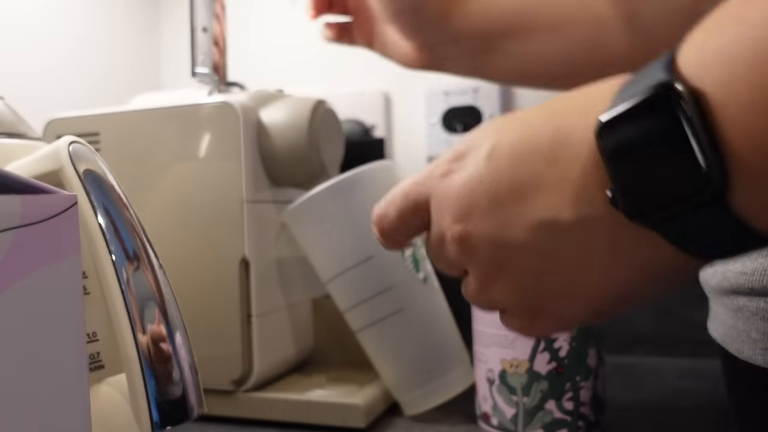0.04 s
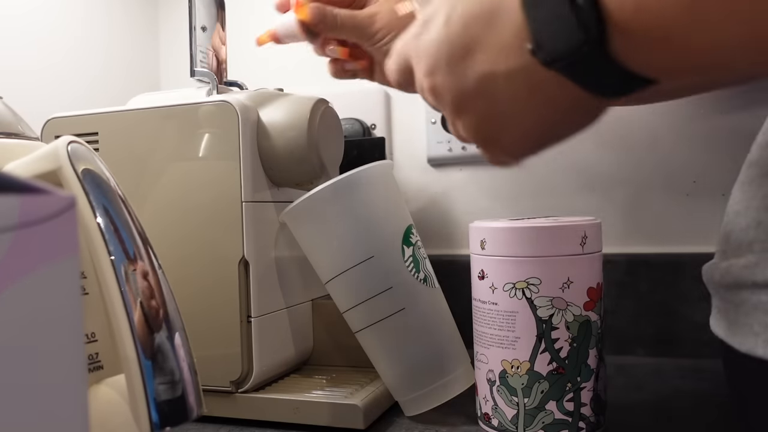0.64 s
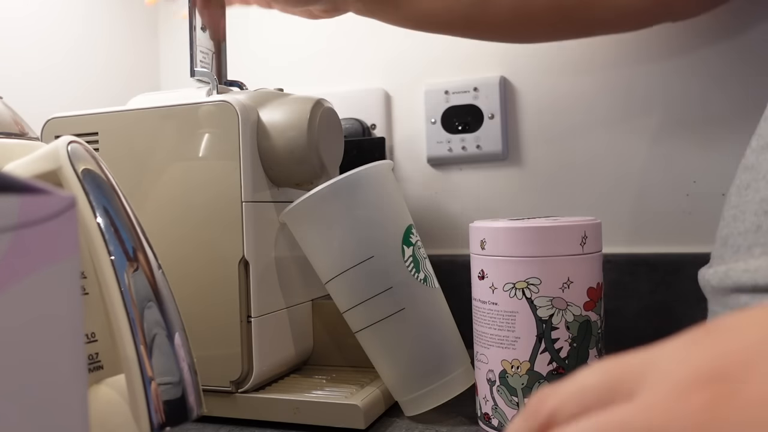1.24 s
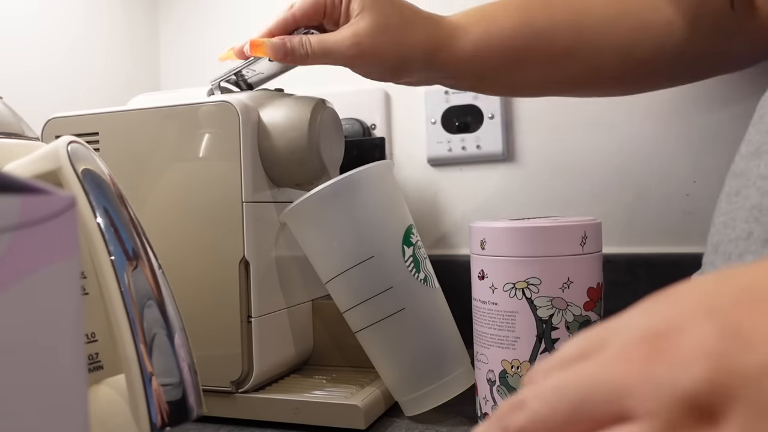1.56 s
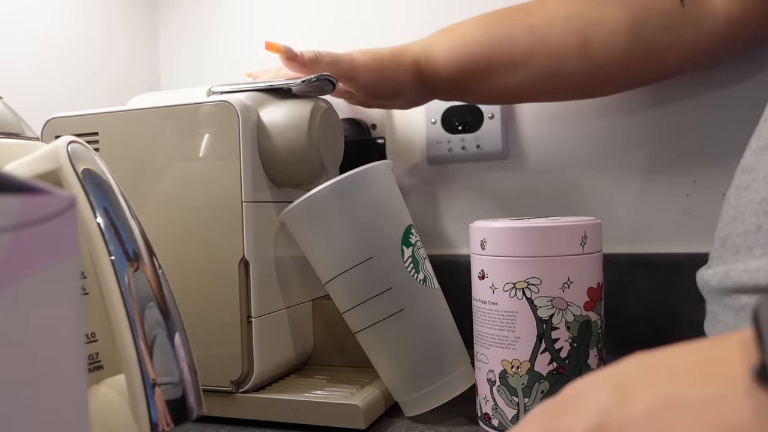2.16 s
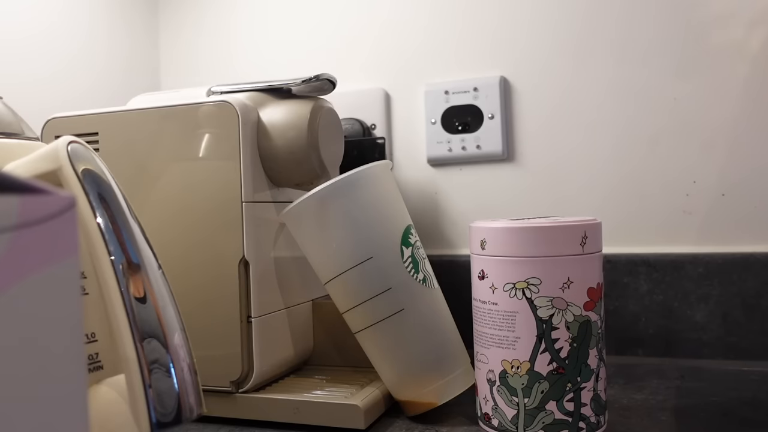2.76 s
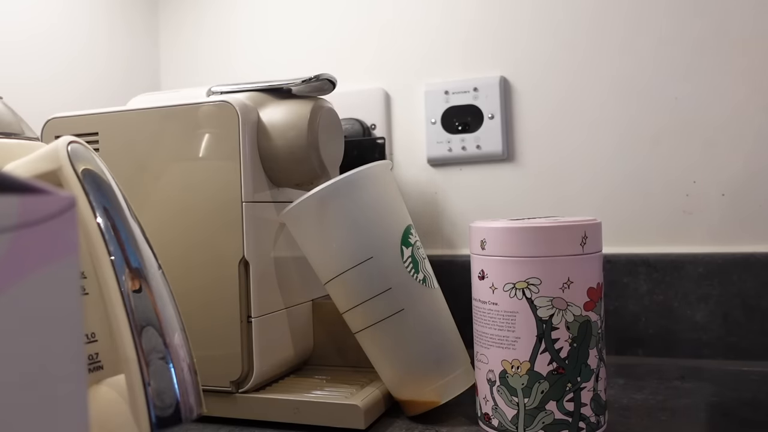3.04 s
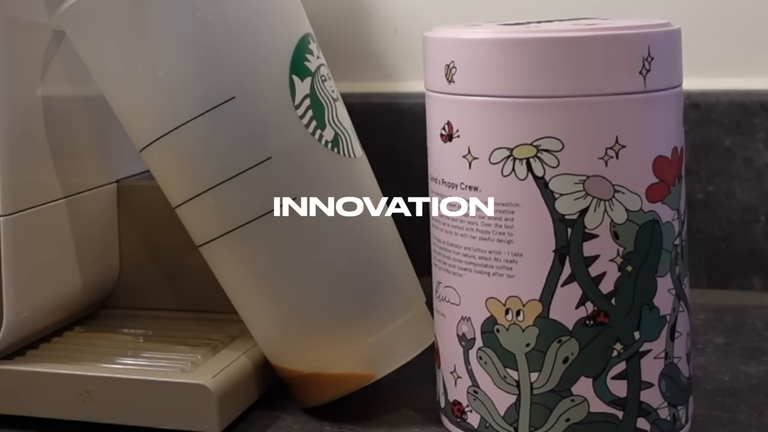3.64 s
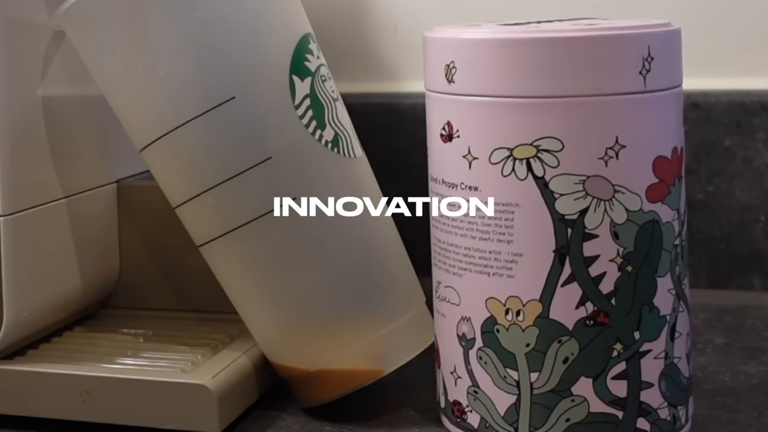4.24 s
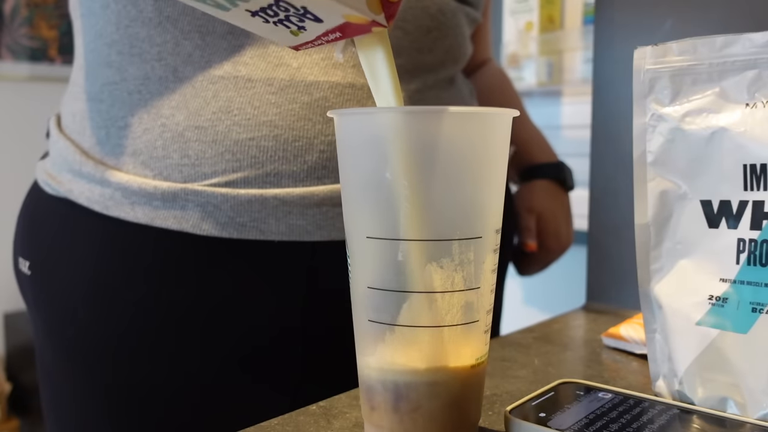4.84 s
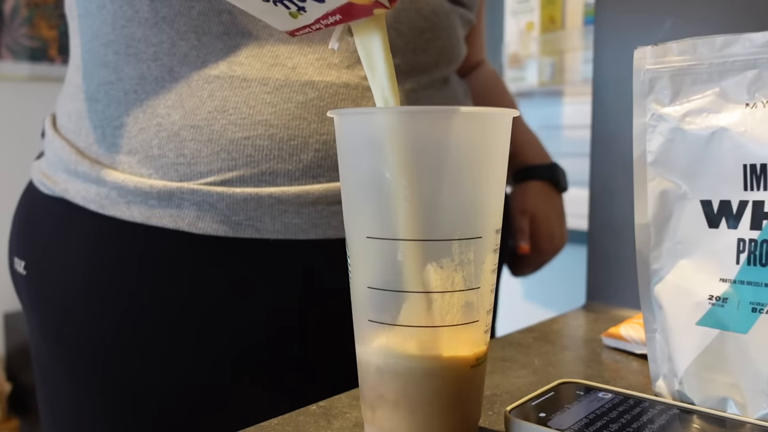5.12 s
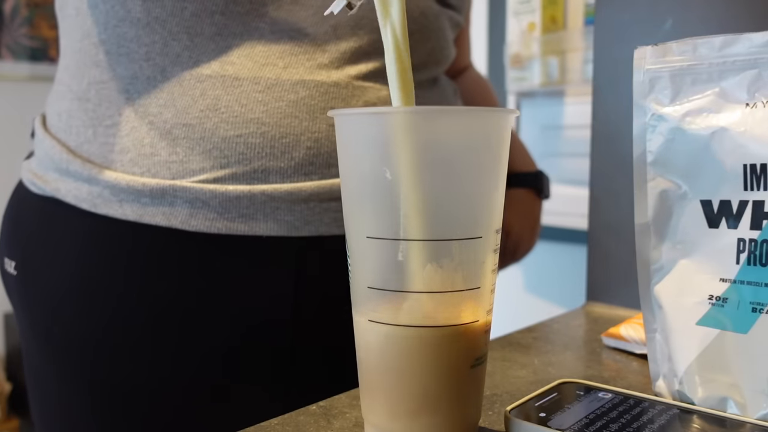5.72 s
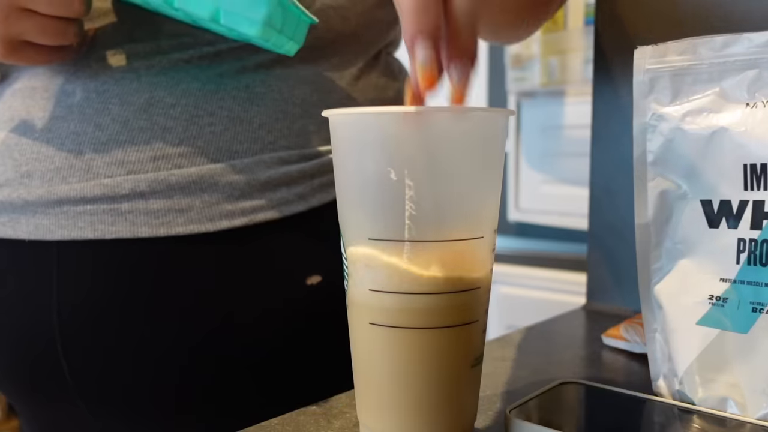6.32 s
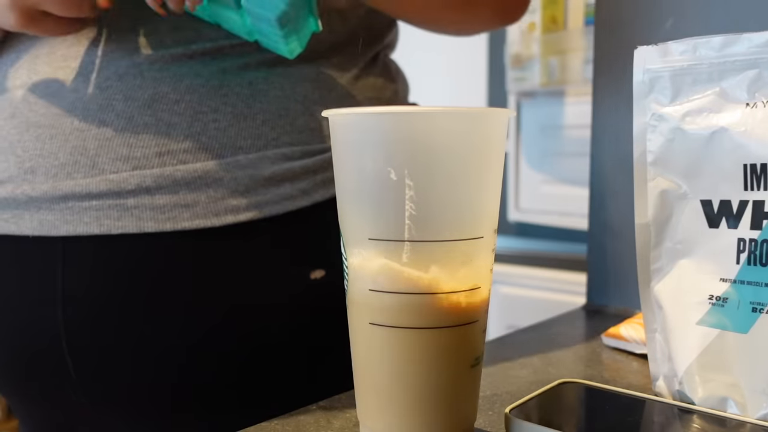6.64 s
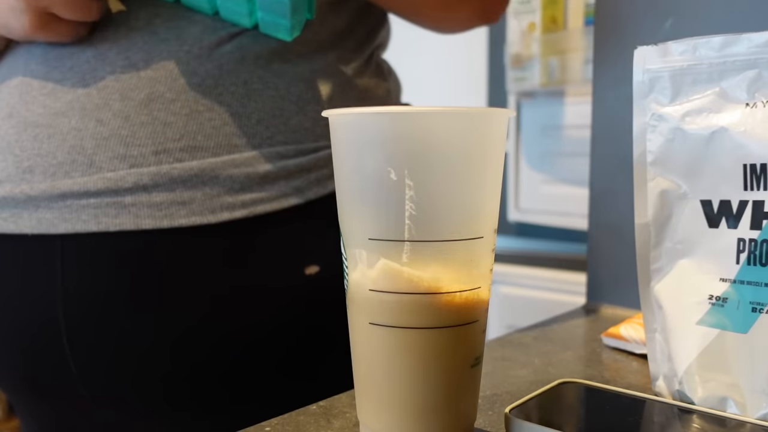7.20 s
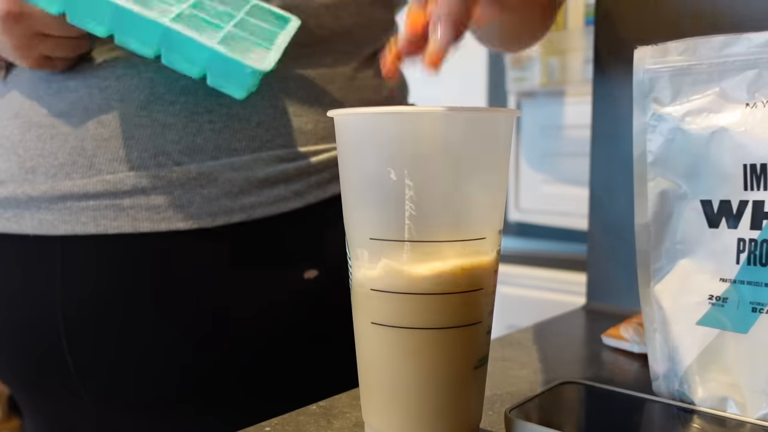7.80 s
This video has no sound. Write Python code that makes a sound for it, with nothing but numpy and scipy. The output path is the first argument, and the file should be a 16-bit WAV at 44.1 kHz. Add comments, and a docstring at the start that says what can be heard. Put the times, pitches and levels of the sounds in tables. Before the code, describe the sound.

Close up in a small kitchen, a capsule ticks lightly into a coffee machine and the metal lever clatters shut with a clunk and a faint ring. The pump buzzes loudly and steadily for about two seconds. It cuts straight to milk pouring into a tall plastic cup, fizzing and growing softer. An ice cube drops in and cracks sharply several times, then another squeaks out of its tray and knocks into the drink.

```python
"""A capsule coffee machine, close up in a kitchen: the capsule rattles in, the metal lever is pressed
shut and rings, and the piston pump buzzes through housing and panels. Then milk runs into a tall
plastic cup, whipping up bubbles and sounding the air column. An ice cube drops in and cracks in the
warm drink; the next one squeaks out of its tray and knocks into the cup."""
import sys
import numpy as np
from scipy import signal
from scipy.fft import rfft, irfft, next_fast_len
from scipy.io import wavfile
from scipy.ndimage import uniform_filter1d, minimum_filter1d, map_coordinates

SR = 44100
rng = np.random.default_rng(int(sys.argv[2]) if len(sys.argv) > 2 else 0)


def file_out(sig):
    """Save sig as 16-bit WAV at sys.argv[1]."""
    # one column per channel
    cols = np.atleast_2d(sig).T
    # limit, then scale
    lim = np.clip(cols, -1, 1)
    pcm = np.round(lim * 32767).astype(np.int16)
    wavfile.write(sys.argv[1], SR, pcm)


N = 346626
TIME = np.arange(N) / SR

# cup resonances: (frequency [Hz], width [Hz], gain [dB])
CUP_MODES = [(117, 33, 5.5), (204, 68, 6), (616, 110, 0), (838, 240, 2), (1230, 150, -7.5), (1600, 92, -8),
             (1990, 370, -5.5), (2450, 220, 0), (3160, 620, 5), (4030, 280, -20)]


def amp(db):
    return 10 ** (np.asarray(db) / 20)


def unit_rms(x):
    return x / np.sqrt(np.mean(x ** 2) + 1e-20)


def along(points, hz):
    """Interpolate (frequency [Hz], value) points on a log axis."""
    knots_hz, values = np.transpose(points)
    return np.interp(np.log(hz + 1), np.log(knots_hz + 1), values)


def fade(t, t60_s):
    return np.exp(-np.log(1000) * t / np.maximum(t60_s, 1e-3))


def gate(start_s, end_s, edge_s):
    return np.clip((TIME - start_s) / edge_s, 0, 1) * np.clip((end_s - TIME) / edge_s, 0, 1)


def wobble(rate_hz, size=N):
    """Smooth random curve."""
    knots = rng.standard_normal(int(size * rate_hz / SR) + 4)
    grid_s = TIME[:size:32]
    return np.interp(TIME[:size], grid_s, map_coordinates(knots, [grid_s * rate_hz]))


def add(track, at_s, sound):
    i = max(round(at_s * SR), 0)
    track[i:i + len(sound)] += sound[:max(N - i, 0)]


def filtered(x, response):
    """Apply a complex frequency response."""
    n = x.shape[-1]
    m = next_fast_len(n + 4096, True)
    return irfft(rfft(x, m) * response(np.fft.rfftfreq(m, 1 / SR)), m)[..., :n]


def bandpass(x, lo_hz, hi_hz, order=2):
    sos = signal.butter(order, [lo_hz, min(hi_hz, SR / 2.1)], "band", fs=SR, output="sos")
    return signal.sosfilt(sos, x)


def resonances(modes, hz):
    """Causal response of damped modes (centre [Hz], width [Hz], gain [dB])."""
    return sum(amp(db) * 1j * hz * w / (c * c - hz * hz + 1j * hz * w) for c, w, db in modes)


def stereo(mid, side):
    return np.array([mid + side, mid - side])


def background():
    """Still air, diffuse above the bass; faint appliance hum; a thin whine during the pour."""
    # air noise spectrum: (frequency [Hz], density [dB])
    air_spectrum = [(15, -44.5), (25, -14), (104, -2), (156, -5), (340, -15.5), (615, -10.5), (718, -7.5),
                    (1600, -19.5), (2070, -15), (2680, -21), (6800, -22), (10800, -32.5), (12000, -37),
                    (15600, -63.5), (22000, -120)]
    mid, side = [unit_rms(filtered(rng.standard_normal(N), lambda hz: amp(along(air_spectrum, hz))))
                 for _ in range(2)]
    side = filtered(side, lambda hz: amp(along([(100, -23), (250, -2.5), (2000, 5.5), (10000, -8.5)], hz)))
    hum = amp(-66.5 + 1.5 * wobble(7.6)) * np.sin(2 * np.pi * 100 * TIME)
    whine = amp(-69) * gate(4.44, 5.97, .02) * np.sin(2 * np.pi * 2024 * TIME + 0.29 * wobble(30))
    return amp(-64.5) * stereo(mid, side) + hum + whine


def blows(contacts, modes, direct, trims_db, thud_t60_s, rise_s, lowest_hz):
    """Rough force bursts ring a body; harder means more treble, less thud. Returns (near, room feed)."""
    # thud, body, clack and treble bands: (low [Hz], high [Hz])
    bands = [(70, 400), (400, 1800), (1800, 5500), (5500, 13000)]
    # gain of each band with hardness: (slope [dB/dB])
    tilts = (-0.3, -0.022, .48, 1.28)
    near, room_feed, t = np.zeros(N), np.zeros(N), np.arange(SR // 5) / SR
    for at_s, db, hardness_db, t60_s in contacts:
        grit = rng.standard_normal(len(t)) * (1 - np.exp(-t / rise_s)) ** 2
        force = np.array([grit * fade(t, thud_t60_s), grit * fade(t, t60_s), t == 0])
        force = bandpass(force, lowest_hz, SR, order=3)
        # the clean impulse stands for the smoother sum over all directions
        thud, body, impulse = filtered(force, lambda hz: direct + resonances(modes, hz))
        for band, tilt, trim_db, ring in zip(bands, tilts, trims_db, (thud, body, body, body)):
            gain = amp(db + trim_db + tilt * hardness_db)
            parts = bandpass(np.array([ring, impulse]), *band, order=3)
            for track, part in zip((near, room_feed), parts):
                add(track, at_s, gain * part / np.std(part[:SR // 30]))
    return np.array([near, room_feed])


def capsule_ticks(t60_s=0.074):
    """Fingers and capsule tick against the slot."""
    # touches: (time [s], strength [dB], hardness [dB])
    touches = [(0.0156, -47.5, 11.5), (0.39, -53, 4.5), (0.7505, -77.5, 19), (0.7743, -76.5, 17.5),
               (0.884, -68, 10), (0.918, -61.5, 5), (0.9337, -50.5, 1), (0.952, -53, 4), (0.9878, -44, -1),
               (1.03, -53, -1), (1.0626, -43.5, -5)]
    # capsule resonances: (frequency [Hz], width [Hz], gain [dB])
    modes = [(300, 120, 4.5), (1210, 120, -4), (1520, 340, -5), (2300, 710, 0.5), (3800, 1400, 4),
             (5440, 180, -9), (6870, 150, -0.5), (10400, 34, -11)]
    ticks = [(*touch, t60_s) for touch in touches]
    return blows(ticks, modes, direct=0.27, trims_db=(-15, 1.5, 0.5, -4),
                 thud_t60_s=0.37, rise_s=0.0003, lowest_hz=151.4)


def metal_ring(shimmer_rad=.7):
    """Thin metal pings at the first touch; the loosely hinged lever rings on after two blows."""
    # partials of the metal by the slot: (frequency [Hz], level [dB], t60 [s])
    ping_partials = [(4080, -15, 0.27), (5440, -10.5, .35), (7000, -13, 0.21), (10400, -2, 0.31),
                     (10920, -1, 0.25), (10500, 11, 0.2)]
    # lever partials: (frequency [Hz], level [dB], t60 [s])
    lever_partials = [(925, -2.5, 0.51), (1900, -8.5, 0.38), (3100, -5.5, .4), (3731, 2, .35),
                      (3990, -1.5, .4), (4270, -7.5, .35), (6230, -7, .45), (6400, -6, .45)]
    # blows on the lever: (time [s], level [dB])
    lever_hits = [(1.088, -45), (1.75, -46)]
    track, t = np.zeros(N), np.arange(SR) / SR

    def tone(hz):
        return np.sin(2 * np.pi * hz * t + shimmer_rad * wobble(60, size=SR))

    def ring(partials):
        return sum(amp(db + rng.normal(0, 1.5)) * fade(t, t60_s) * tone(hz) for hz, db, t60_s in partials)

    add(track, .017, amp(-50) * ring(ping_partials))
    for at_s, db in lever_hits:
        add(track, at_s, amp(db) * ring(lever_partials))
    return track


def lever_clunks():
    """A finger touches the housing; the capsule drops into its chamber; then the lever and its clamp knock the
    housing."""
    # contacts: (time [s], strength [dB], hardness [dB], t60 [s])
    contacts = [(0.018, -53, -17, 0.074), (1.0838, -37.5, 5, 0.13), (1.0896, -34.5, 9.5, 0.03),
                (1.3422, -45, -13.5, 0.041), (1.3554, -38, -5.5, 0.096), (1.3855, -36, -4, 0.12),
                (1.395, -27, -4.5, 0.12), (1.4114, -32, 0, 0.35), (1.4285, -28.5, 1.5, 0.12),
                (1.48, -26.5, 5, 0.042), (1.4877, -25.5, -6, 0.11), (1.5255, -24, 2, 0.064),
                (1.5728, -31.5, -1.5, 0.053), (1.7438, -35, -4, 0.043), (1.7501, -23.5, 12, .05),
                (1.7538, -10.5, -2, 0.04), (1.7743, -29, -13, 0.16), (1.9394, -49, 14.5, 0.22)]
    # housing resonances: (frequency [Hz], width [Hz], gain [dB])
    modes = [(125, 26, -1), (278, 47, -0.5), (325, 87, 1), (472, 72, 0), (585, 31, -2.5), (764, 250, -2),
             (1187, 86, -6.5), (1793, 77, -13.5), (2190, 100, -12), (2624, 450, -15), (3840, 510, -18),
             (4360, 49, -20.5), (6590, 1400, -14.5)]
    return blows(contacts, modes, direct=0.12, trims_db=(-10.5, 1, -3, -16.5),
                 thud_t60_s=0.26, rise_s=0.00088, lowest_hz=74.7)


def friction():
    """Sticking surfaces squeak briefly; sliding ones rasp."""
    # rubbed plastic and ice: (time [s], level [dB], pitch [Hz], t60 [s])
    squeaks = [(0.338, -41, 610, 0.11), (0.354, -31.5, 635, .05), (6.722, -19.5, 1725, 0.027),
               (7.241, -14.5, 1560, 0.048), (7.26, -9.5, 1430, 0.038), (7.276, -3, 1600, 0.024)]
    # sliding plastic: (start [s], end [s], level [dB], centre [Hz])
    rubs = [(0.593, 0.707, -61.5, 6700), (1.307, 1.378, -42.5, 332), (1.42, 1.59, -36.5, 272),
            (1.68, 1.784, -40, 300), (6.248, 6.342, -45, 5560), (6.27, 6.552, -58, 128),
            (6.85, 7, -60.5, 240), (7.57, 7.743, -56.5, 230)]
    track, t = np.zeros(N), np.arange(SR // 10) / SR
    for at_s, db, hz, t60_s in squeaks:
        jitter = unit_rms(uniform_filter1d(rng.standard_normal(len(t)), 30))
        phase = 2 * np.pi * np.cumsum(hz * (1 + 0.19 * jitter)) / SR
        envelope = (1 - np.exp(-t / 0.0052)) * fade(t, t60_s)
        add(track, at_s, amp(db - 3) * envelope * np.sin(phase))
    for start_s, end_s, db, hz in rubs:
        t = np.arange(start_s, end_s, 1 / SR)
        rasp = unit_rms(bandpass(rng.standard_normal(len(t)), hz * 0.59, hz * 1.32))
        envelope = np.minimum(1, np.minimum(t - start_s, end_s - t) / .04)
        add(track, start_s, amp(db) * envelope * rasp)
    return track


def pump(start_s=2.272, stop_s=4.438, stroke_hz=49.9):
    """Mains-driven piston: each stroke booms in the housing, then hits its stop and rattles the panels."""
    # strong tones: (multiple of the stroke rate, level [dB])
    harmonics = [(2, -15.5), (3, -26.5), (5, -29.5), (6, 0), (7, 1), (9, -14), (10, -20), (12, -21.5),
                 (13, -21.5), (14, -6.5), (15, -4.5), (22, -13.5)]
    # rattle spectrum: (frequency [Hz], density [dB])
    spectrum = [(40.0, -21.5), (190.0, -18), (325.0, 1), (570.0, -15.5), (730.0, 1), (1080.0, -6.5),
                (1550.0, -9.5), (2150.0, -9), (2700.0, -13), (3500.0, -16), (4600.0, -12), (6700.0, -14.5),
                (8200.0, -16), (11000.0, -27)]
    # panel resonances: (frequency [Hz], width [Hz], gain [dB])
    panels = [(1963, 49, -5), (2214, 73, -5), (2960, 19, 0), (3914, 42, -5), (4655, 110, -7),
              (5860, 550, -10), (6680, 170, -4), (9300, 180, -6.5)]
    # valve rasp: (time [s], level [dB])
    rasp_levels = [(2.27, -45), (3.0, -55), (3.3, -45), (3.7, -44.5), (4.0, -52), (4.44, -57)]
    # stereo spread: (frequency [Hz], side gain [dB])
    spread = [(100, -61), (350, -64), (520, -15), (730, -20), (1100, -27), (3500, -22.5), (11000, -20.5)]
    running = gate(start_s, stop_s, 0.004)
    on = running > 0
    strokes = (TIME - start_s) * stroke_hz + 0.0018 * wobble(6.23) + 0.00055 * wobble(28)
    drifts = [wobble(4.01)[on] for _ in range(5)]
    # weaker harmonics fall 11.5 dB per octave
    buzz = [(k, -16 - 11.5 * np.log2(k / 16)) for k in range(16, 31) if k not in dict(harmonics)]
    hum = np.zeros(N)
    for k, db in harmonics + buzz:
        lag_strokes = .27 if k <= 10 else .9  # the boom swells between hits
        scatter_rad = rng.normal(0, .15 if k <= 10 else .4 if k <= 15 else 1.7)
        waver_db = drifts[int(k) % len(drifts)] * (.3 if db > -10 else 1.3)
        hum[on] += amp(db + waver_db) * np.cos(2 * np.pi * k * (strokes[on] - lag_strokes) + scatter_rad)
    since_hit = (strokes - .72) % 1
    hit = np.minimum(since_hit / 0.39, 1) * np.exp(-since_hit / 0.52)
    chatter = rng.standard_normal(N) * (0.09 + hit) * amp(0.59 * wobble(50))
    rattle = filtered(chatter, lambda hz: amp(along(spectrum, hz)) * (1 + 1.97 * resonances(panels, hz)))
    valve = filtered(chatter, lambda hz: resonances([(2201, 69, 0)], hz) ** 2)
    valve_db = np.interp(TIME, *np.transpose(rasp_levels))
    mid = running * (amp(-21.5) * hum + amp(-28) * unit_rms(rattle) + amp(valve_db) * unit_rms(valve))

    def side_response(hz):
        """The housing's mid range radiates to the right, the rattle to both sides."""
        return amp(along(spread, hz)) * np.where(hz < 950, -1, np.exp(-2j * np.pi * hz * .0023))

    return stereo(mid, filtered(mid, side_response))


def bubbles(times_s, gains, hz, decay_cycles):
    """Each bubble is a damped tone, rising slightly in pitch."""
    t = np.arange(400) / SR
    cycles = t * hz[:, None]
    age = cycles / decay_cycles
    phase = 2 * np.pi * cycles * (1 + 0.024 * np.minimum(age, 4))
    tones = gains[:, None] * np.exp(-age) * np.sin(phase)
    index = (times_s * SR).astype(int)[:, None] + np.arange(len(t))
    return np.bincount(index.ravel(), tones.ravel(), N)[:N]


def milk(start_s=4.436, stop_s=6.0, air_m=.149, fill_m_per_s=.023, foam_s=0.84, count=3000):
    """The stream whips up bubbles and sounds the shrinking air column; growing foam hushes both."""
    # loudest splashes: (time [s], level [dB])
    splash_events = [(4.4862, -37), (4.7076, -35), (4.78, -33), (5.0875, -28.5), (5.3233, -40),
                     (5.3806, -35.5), (5.8692, -42)]
    # upper air modes of the cup: (frequency [Hz], width [Hz], gain [dB])
    air_modes = [(1730, 100, -14), (3090, 360, -2), (3980, 690, -7.5)]
    poured_s = np.clip(TIME - start_s, 0, stop_s - start_s)
    waver_db = 3 * wobble(18)  # uneven stream
    fizz_db = -67 + 22 * np.exp(-poured_s / foam_s) + waver_db
    column_db = -47 - 29 * poured_s + waver_db

    births_s = rng.uniform(start_s, stop_s, count)
    gains = amp(4.5 * np.minimum(rng.exponential(size=count), 4))
    bubble_hz = np.clip(2900 * np.exp(.4 * rng.standard_normal(count)), 1200, 9000)
    fizz = bubbles(births_s, gains, bubble_hz, decay_cycles=9.2)

    splash_s, splash_db = np.transpose(splash_events)
    scatter = rng.standard_normal((len(splash_s), 2, 9))  # nine bubbles a splash
    spray_s = (splash_s[:, None] + 0.0049 * np.abs(scatter[:, 0])).ravel()
    spray_hz = 2980 * np.exp(0.37 * scatter[:, 1]).ravel()
    splashes = bubbles(spray_s, np.repeat(amp(splash_db - 7), 9), spray_hz, decay_cycles=7.4)
    fizz, splashes = filtered(np.array([fizz, splashes]), lambda hz: 0.45 + resonances(air_modes, hz))
    fizz /= np.std(fizz[(TIME > start_s) & (TIME < stop_s)])

    quarter_wave_hz = 343 / (4 * (air_m - fill_m_per_s * poured_s))
    phase = 2 * np.pi * np.cumsum(quarter_wave_hz) / SR
    column = unit_rms(wobble(55) * np.sin(phase) + 1.7 * wobble(160) * np.cos(phase))
    return splashes + gate(start_s, stop_s, 0.0029) * (amp(fizz_db) * fizz + amp(column_db) * column)


def carton_glug(start_s=5.565, end_s=5.985, fall_db_per_s=39):
    """Air gulps into the carton."""
    level_db = -46.5 - fall_db_per_s * np.maximum(TIME - start_s, 0)
    gulp = unit_rms(bandpass(rng.standard_normal(N), 100, 216, order=3))
    return amp(level_db) * gulp * gate(start_s, end_s, 0.013)


def ice_cracks(t60_s=0.02, piece_width_hz=300, piece_db=3.5):
    """Each crack is a brief snap that rings the drink and the piece splitting off."""
    # cracks: (time [s], strength [dB], pitch of the piece [Hz])
    cracks = [(6.2295, -37, 4240), (6.4475, -25, 3240), (6.4694, -16.5, 3070), (6.5312, -23.5, 5840),
              (6.576, -14, 2770), (6.748, -11, 3170), (6.8346, -7.5, 2600), (6.999, -12.5, 2840),
              (7.0186, -25.5, 4560), (7.1142, -34.5, 5000), (7.1478, -14, 5440)]
    # resonances of the iced drink: (frequency [Hz], width [Hz], gain [dB])
    drink_modes = [(666, 81, -1), (1090, 430, -3.5), (2750, 340, -5), (3390, 410, -11), (4200, 2200, -1.5),
                   (6600, 4200, -3)]
    track = np.zeros((2, N))
    for at_s, db, hz in cracks:
        hardness_db = 6.5 * np.log2(hz / 3000)  # smaller pieces snap brighter
        modes = drink_modes + [(hz, piece_width_hz, piece_db)]
        track += blows([(at_s, db, hardness_db, t60_s)], modes, direct=.1,
                       trims_db=(-67, -34.5, -18.5, -18.5), thud_t60_s=.05, rise_s=0.00037, lowest_hz=480)
    return track


def cube_knocks():
    """Cubes knock on tray and cup."""
    # knocks: (time [s], strength [dB], hardness [dB], t60 [s])
    knocks = [(6.357, -50, 11, .058), (6.3956, -40.5, 2, 0.052), (6.4043, -37.5, 17, 0.031),
              (7.2738, -35, 11.5, 0.096), (7.3237, -27.5, 17, 0.027), (7.432, -27.5, -9, 0.039),
              (7.7399, -25.5, -15, 0.016), (7.7546, -23.5, -5, 0.051), (7.8436, -34.5, -7, .04)]
    return blows(knocks, CUP_MODES, direct=0.11, trims_db=(-13, 0.5, -5, -27.5),
                 thud_t60_s=0.43, rise_s=0.00015, lowest_hz=75)


def cube_plunges(rise_s=0.0024, t60_s=0.31):
    """A sinking cube shakes the cup's two lowest modes."""
    # plunges: (time [s], level [dB])
    plunges = [(6.408, -41), (7.436, -27)]
    track, t = np.zeros(N), np.arange(SR // 2) / SR
    envelope = (1 - np.exp(-t / rise_s)) * fade(t, t60_s)
    for at_s, db in plunges:
        slosh = filtered(rng.standard_normal(len(t)), lambda hz: resonances(CUP_MODES[:2], hz) ** 2)
        add(track, at_s, amp(db) * envelope * unit_rms(slosh))
    return track


def worktop_echoes(x, echo_db):
    """Cup wall and worktop add weak early copies."""
    delays_s, signs = rng.uniform(.002, .011, 8), rng.choice([-1, 1], 8)
    out = x.copy()
    for delay_s, sign in zip(delays_s, signs):
        add(out, delay_s, sign * amp(echo_db) * x)
    return out


def kitchen_reverb(x, width):
    """Hard walls return a noise tail, drawn anew for each block of sound."""
    # room decay: (frequency [Hz], t60 [s])
    decay = [(100, 0.99), (250, 0.46), (700, 0.58), (2000, 0.52), (5000, 0.56), (11000, 0.44)]
    wet, step = np.zeros((2, N)), SR // 6
    for i in range(0, N, step):
        block = x[i:i + step]
        if np.abs(block).max() < 1e-5:
            continue
        hz, t, noise = signal.stft(rng.standard_normal((2, SR // 2)), SR, nperseg=256)
        tails = signal.istft(noise * fade(t, along(decay, hz)[:, None]), SR, nperseg=256)[1]
        for track, tail in zip(wet, tails):
            add(track, i / SR + .005, signal.fftconvolve(block, tail / np.linalg.norm(tail)))
    return stereo(wet[0], width * filtered(wet[1], lambda hz: hz / (hz + 500)))


def scene():
    """Capsule, lever, pump, milk and ice on a worktop in a small hard room."""
    ticks, ticks_feed = capsule_ticks()
    clunks, clunks_feed = lever_clunks()
    cracks, cracks_feed = ice_cracks()
    knocks, knocks_feed = cube_knocks()
    others = friction() + milk() + carton_glug() + cube_plunges() + metal_ring()
    near = ticks + clunks + amp(-1) * worktop_echoes(cracks + knocks, echo_db=-18.5) + others
    room_feed = (amp(-10) * ticks_feed + amp(-10.5) * (clunks_feed + others)
                 + amp(-7) * cracks_feed + amp(-7.5) * knocks_feed)
    side = filtered(near, lambda hz: 0.23j * hz / (hz + 1100))  # treble phase differs left to right
    pan = amp(np.array([[-.2], [.2]]) * (TIME > 4.44))  # the cup stands slightly right
    return stereo(near, side) * pan + pump() + background() + kitchen_reverb(room_feed, width=0.22)


def record(dry, ceiling=.56, top_hz=11550):
    """Peak limiter, then a steep low-pass."""
    needed = np.minimum(1, ceiling / (np.abs(dry).max(axis=0) + 1e-9))
    gain = uniform_filter1d(minimum_filter1d(needed, size=400), size=200)
    return filtered(dry * gain, lambda hz: 1 / np.sqrt(1 + (hz / top_hz) ** 70))


dry = scene()
out = record(dry)
file_out(out)
```